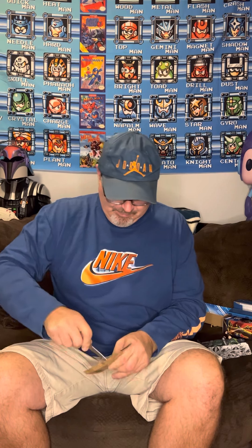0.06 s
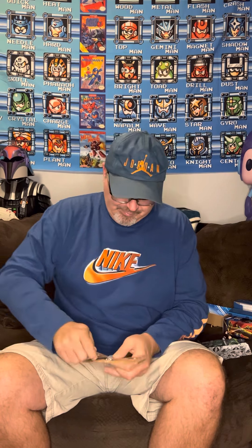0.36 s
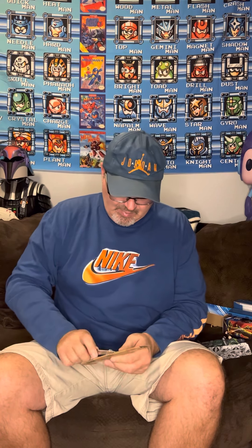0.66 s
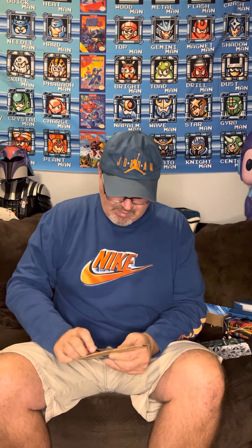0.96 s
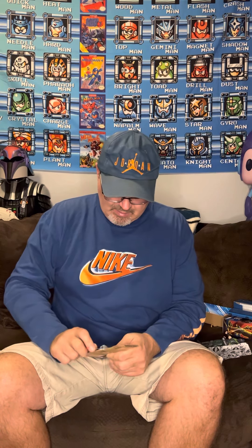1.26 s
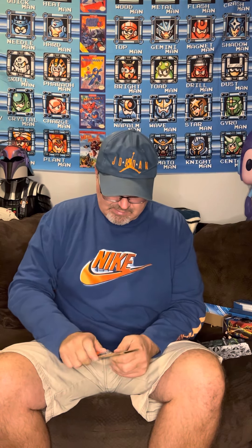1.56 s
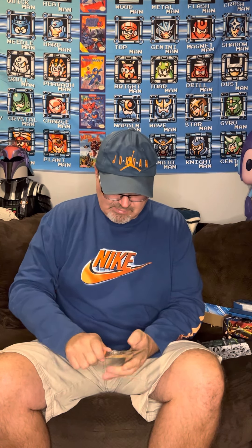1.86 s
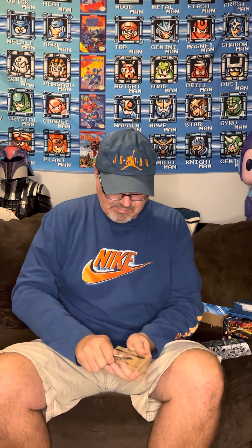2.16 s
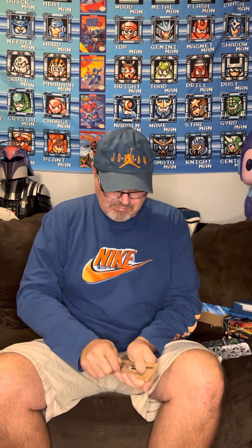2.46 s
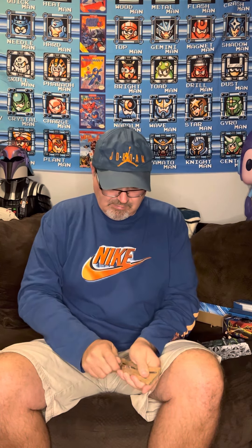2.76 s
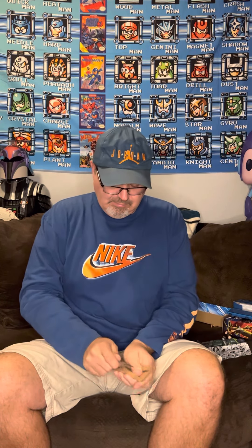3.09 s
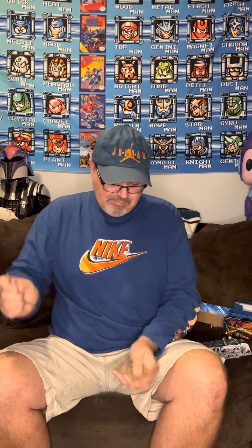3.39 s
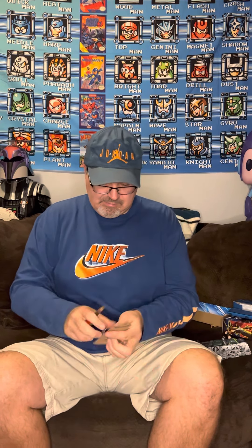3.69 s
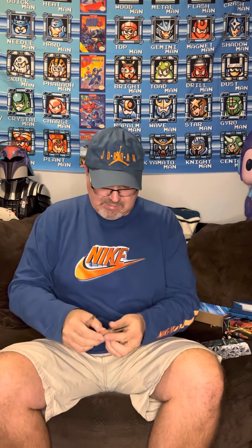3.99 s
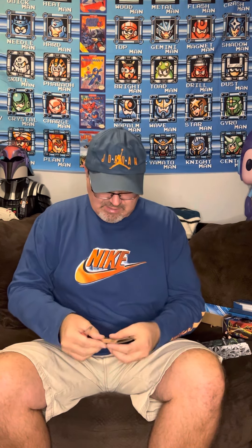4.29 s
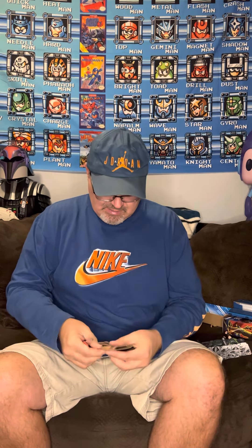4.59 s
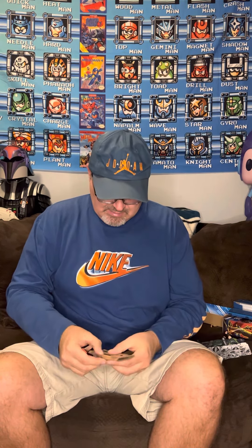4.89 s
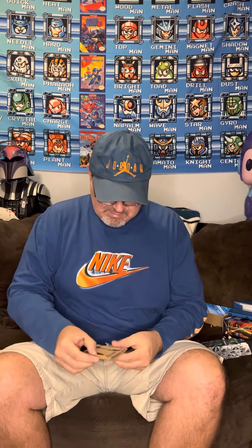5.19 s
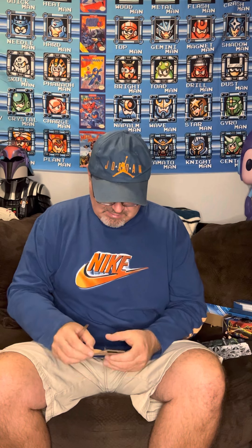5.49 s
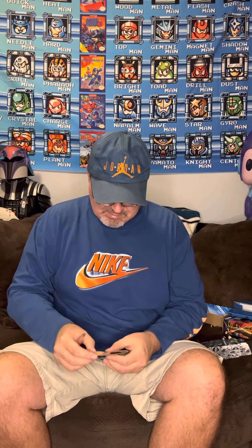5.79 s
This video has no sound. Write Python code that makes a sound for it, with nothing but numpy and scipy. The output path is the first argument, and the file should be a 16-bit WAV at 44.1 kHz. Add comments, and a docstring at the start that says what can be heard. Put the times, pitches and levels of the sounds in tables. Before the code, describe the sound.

Hands pry small parts out of a stiff plastic package, close to the microphone in a small quiet room. The plastic buckles in sharp, irregular snaps with fine crinkling and faint finger rubbing between them. About halfway, a part breaks free with a loud, briefly ringing crack and a soft thump of hands on a lap. More crackles follow and thin out, over a very faint hum and hiss.

```python
"""A small furnished room, where hands pry small parts out of a stiff plastic toy package.
The bending sheet buckles in sharp snaps that ring its modes, with fine crinkling around each one.
Fingers stick and slip over the plastic, and one part breaks free with a loud crack and a brief ring.
Hands bump softly on the lap; a faint mains hum, hiss and low rumble lie under it all."""
import sys
import numpy as np
from scipy import signal
from scipy.fft import rfft, irfft
from scipy.io import wavfile

SR = 44100
rng = np.random.default_rng(int(sys.argv[2]) if len(sys.argv) > 2 else 0)


def digitize_waveform(pressure):
    """Quantize a signal to 16-bit integers and store it at the path in sys.argv[1].

    Rows of a 2-D input are taken as channels; values are limited to [-1, 1].
    """
    field = np.atleast_2d(pressure).T
    bounded = np.clip(field, -1, 1)
    quanta = np.round(bounded * 32767).astype(np.int16)
    wavfile.write(sys.argv[1], SR, quanta)


N = 266805

# snaps of the sheet: (time [s], strength [dB], buckling length [ms], main resonance [Hz],
# body near 700 Hz [dB], edge near 13 kHz [dB])
SNAPS = [(0.0088, -6, 4.3, 5600, 0, 14.5), (0.0622, -6.5, 0.45, 6500.0, -18, 3),
         (0.1927, -14, 1.9, 4070.0, -7, 15), (0.199, -3.5, 1.7, 3830.0, 1.5, 4),
         (0.226, -5.5, 3.1, 4780.0, -5, 7.0), (0.2368, -4, 1.0, 7940.0, -7, -1.0),
         (0.2413, 2.5, 1.1, 5360.0, -27, -3), (0.262, -12, 6.0, 8440.0, -6.0, 5.0),
         (0.273, -11, 4.1, 5600.0, -5.0, 12), (0.285, -5.5, 6.2, 8960.0, 3.0, 2),
         (0.3523, -11, 3.5, 5500.0, 10.5, 12.5), (0.4891, -21.5, 4.9, 5450.0, -3, 14),
         (0.505, -11.5, 4.6, 3340.0, -5, 6.5), (0.5416, -11.5, 5.2, 6800.0, 10.0, 6.5),
         (0.7081, -21, 2.4, 8500.0, 9, 10), (0.7381, -16, 2.1, 6850.0, 5, 8),
         (0.8156, -10.5, 0.5, 8600.0, -4.0, 0), (0.915, -26.5, 2.3, 1400.0, 19, -3),
         (0.9327, -20.5, 2.7, 9700.0, 4, -6), (0.9933, -14.5, 2.1, 6800.0, -2.0, 6.0),
         (1.003, -11, 5.6, 7800.0, 18, 8.0), (1.0228, -13, 1.7, 6740, 19, 12),
         (1.0333, -6, 4.4, 6000, 18.5, 13), (1.096, -5.5, 5, 5200, 19.5, 0),
         (1.1618, -21.5, 3.7, 5380.0, -4, 6.0), (1.2356, 2, 7.2, 3130, 20.5, 2),
         (1.2513, -0.5, 11.6, 1280, 22.0, -1), (1.2742, 5, 4.1, 5960.0, 14.0, 8.0),
         (1.281, 7.5, 3.8, 5800.0, 2.5, 3), (1.4659, -12.5, 3.8, 4700, -1.5, -10),
         (1.62, -28.5, 3.5, 6900.0, 3.0, 14.5), (1.6596, -27, 2.7, 7640.0, -10, 14.5),
         (1.74, -23, 1.5, 6900.0, 12, 10), (1.801, -15.5, 2.4, 7500, 10.5, 14),
         (1.811, -10.5, 4.1, 6400, -4, 4), (1.8945, -21, 3.1, 6900.0, 1, 13),
         (1.9339, -16, 15, 7920.0, 11, 3), (1.9662, -10, 7.5, 7200.0, 18, 7),
         (2.155, -20.0, 11, 6000.0, 18, -1), (2.206, -24, 2.8, 2470.0, 19.5, 2),
         (2.2603, -19.5, 1.1, 8260.0, -4.0, 10), (2.266, -17.0, 1.2, 7390.0, -10.0, 5.0),
         (2.2842, -13, 0.98, 6000.0, 2.0, 8.0), (2.3645, -23.5, 5.5, 1680, 24.5, 14.0),
         (2.4041, -18.5, 10, 1980, 16.5, 10), (2.4168, -10.5, 0.97, 8200, -1, 8),
         (2.5192, -8.5, 2.1, 9300.0, -1, 6.5), (2.5446, -2.0, 4.3, 5800, -16, 6),
         (2.562, -6.5, 8.2, 5770.0, -17, 7.0), (2.5775, -5.5, 4.8, 8830.0, 3.5, 12),
         (2.6166, 1.5, 0.45, 6760.0, 6.5, 4.5), (2.774, -17, 3.1, 1550.0, 7.5, 5),
         (2.8003, -14, 1.1, 2480.0, -1.0, 6), (2.857, -18.5, 4.7, 1790.0, 32.5, 8.0),
         (2.8653, -10.5, 2.9, 1620.0, 0, 3), (2.899, -17.5, 4.8, 1860.0, 3.0, 9),
         (2.991, -12.5, 2.4, 2260, 1, 3.0), (3.0134, -16, 3.0, 1930.0, 4.0, 7),
         (3.036, -11.5, 7.2, 7960, 5.5, 12), (3.0763, -20.0, 3.3, 1810.0, 21.5, 12),
         (3.181, -4, 1.8, 3300.0, 10, 4.0), (3.1853, 16.5, 0.86, 3300, 7, -4.5),
         (3.3092, -16.5, 5.9, 2600, 12, 11.0), (3.3362, -4, 2.2, 7100.0, -7, 6.0),
         (3.369, -17, 0.8, 10000, -5, 19.5), (3.377, -5.5, 2.4, 7600.0, 6.5, 2.5),
         (3.402, -6.5, 1.9, 4130.0, 2, 3), (3.4259, -11.5, 2.0, 4260, 5, 3.0),
         (3.6358, -17.5, 3.5, 7550, 7, -3), (3.772, -20.0, 9.5, 3230.0, 15.5, -4),
         (3.8259, -21.0, 2.8, 7700, 4, 5), (3.862, -26.5, 2.4, 8200, 8.0, 10),
         (3.99, -19.0, 5.3, 4100, 22, 2), (4.014, -15, 21, 3650.0, 12, 1),
         (4.1147, -19.5, 2.7, 8830.0, 1, 6), (4.134, -13.0, 6.1, 4720.0, -6, 6),
         (4.166, -13, 4.8, 3900.0, 4, 1), (4.264, -24.5, 2, 5430.0, -16, 0),
         (4.311, -4.5, 3.8, 6900.0, 4.5, 3), (4.3165, 1.5, 7.2, 4970, -16, 3),
         (4.338, -8, 4.7, 4390.0, 0, 8), (4.43, -5, 5.2, 4330, 6.5, 2.5), (4.528, -20, 2.3, 8600.0, 8, 3),
         (4.585, -7, 4.5, 5500, 16, 8.5), (4.714, -14, 14, 10100, 1.5, 4.0),
         (4.8438, -26, 4.0, 7800, 4.0, 9), (4.8925, -21.5, 2.7, 6340, 9, 12.0),
         (4.945, -18.5, 16.0, 7760.0, 14.5, 15), (4.966, -15, 5.3, 7700.0, 5, 12.5),
         (5.055, -24.0, 5.4, 8810.0, 17, 12), (5.0761, -24.5, 2.9, 3320.0, 18, 10.0),
         (5.0948, -8, 2.6, 8700.0, 13.5, 10), (5.199, -25.5, 7.8, 2040, 23.5, 0),
         (5.6105, -18, 1.2, 7300.0, 0.5, 4), (5.649, -16.5, 3.0, 9350.0, -6, 13),
         (5.6805, -17, 0.9, 7150.0, -11, 3), (5.763, -25, 1.4, 5400.0, 6, 7),
         (5.7885, -26, 3.1, 6010.0, 13, 3), (5.918, -26, 9.1, 7900, 16.5, 11),
         (5.968, -25.5, 2.9, 7360.0, -5, 13)]


def gain_of(db):
    """Decibels to amplitude."""
    return 10 ** (np.asarray(db) / 20)


def unit_rms(x):
    """Scales to an rms of 1."""
    return x / np.sqrt(np.mean(x ** 2) + 1e-20)


def curve_at(points, hz):
    """Joins (Hz, value) points by straight lines on a log-frequency axis."""
    f, value = np.transpose(points)
    return np.interp(np.log(hz + 1), np.log(np.abs(f) + 1), value)


def bins(size):
    """Frequencies of a spectrum of so many samples."""
    return np.fft.rfftfreq(size, 1 / SR)


def add(mix, s, sound):
    """Mixes a sound in at s seconds."""
    part = mix[:, max(round(s * SR), 0):][:, :sound.shape[-1]]
    part += sound[..., :part.shape[1]]


def wander(size, per_s):
    """A random curve of about unit spread with so many turns a second."""
    t = np.arange(size) / SR
    return np.interp(t * per_s, np.arange(512), rng.standard_normal(512))


def causal_eq(x, db):
    """Minimum-phase EQ with a gain for each bin: nothing sounds before the click."""
    size = x.shape[-1]
    log_gain = np.log(gain_of(db))
    mirrored = np.r_[log_gain, log_gain[1:size - len(db) + 1][::-1]]
    phase = -signal.hilbert(mirrored).imag[:len(db)]
    return irfft(rfft(x) * np.exp(log_gain + 1j * phase), size)


def diffuse(size):
    """Stereo white noise, centred in the bass and wider above."""
    # left-right likeness of diffuse sound: (frequency [Hz], coherence [0-1])
    likeness = [(60, .997), (150, 0.89), (350, 0.6), (700, 0), (1400, 0.6), (3200, 0.8), (7000, 0.2),
                (15000, .2)]
    a, b = rfft(rng.standard_normal((2, size)))
    same = np.clip(curve_at(likeness, bins(size)), 0, 1)
    mid, side = a * np.sqrt((1 + same) / 2), b * np.sqrt((1 - same) / 2)
    return irfft(np.array([mid + side, mid - side]), size)


def shaped_noise(gains, size):
    """Diffuse noise with a gain for each bin, at an rms of 1."""
    return unit_rms(irfft(rfft(diffuse(size)) * gains, size))


def echo_tail(rise_s, t60=0.2, lumpy_db=3, size=16384):
    """Dying echoes of sheet and room in uneven clumps, of energy 1."""
    t = np.arange(size) / SR
    fade = gain_of(lumpy_db * wander(size, per_s=550) - 60 * t / t60)
    return unit_rms(diffuse(size) * fade * (1 - np.exp(-t / rise_s))) / np.sqrt(size)


def room_tone(noise_db=-74):
    """A steady bed of bass-heavy noise, faint hiss and mains hum."""
    # colour of the quiet room: (frequency [Hz], relative level [dB])
    colour = [(20, -42.5), (35, -15), (62, -3.5), (90, -9), (125, -6.5), (160, -8), (300, -15), (600, -23),
              (1500, -29.5), (3000, -34.5), (7000, -35.5), (11000, -40.5), (16000, -44.5)]
    # partials of the hum: (frequency [Hz], rms level [dB])
    partials = [(60, -77), (119.5, -77)]
    t = np.arange(N) / SR
    noise = shaped_noise(gain_of(curve_at(colour, bins(N))), N)
    hum = sum(np.sqrt(2) * gain_of(db) * np.sin(2 * np.pi * (hz * t + rng.random()))
              for hz, db in partials)
    return gain_of(noise_db) * noise + hum


def rumble(early_db=-68, late_db=-78, sink_s=(3.6, 4.4), low_hz=45, high_hz=90, uneven_db=3):
    """A low, uneven rumble that sinks away in the second half."""
    hz = bins(N)
    band = (hz / low_hz) ** 4 / (1 + (hz / low_hz) ** 4) / (1 + (hz / high_hz) ** 4)
    level_db = np.interp(np.arange(N) / SR, sink_s, [early_db, late_db])
    level_db += uneven_db * wander(N, per_s=9)
    return gain_of(level_db) * shaped_noise(band, N)


def lap_bumps(knock_t60=0.08, knock_rise_s=0.00035, sag=0.15, sag_s=0.051, scuff_db=-4, scuff_hz=290,
              thud_t60=0.061, thud_rise_s=0.0036, room_db=-19, size=8192):
    """Hands meet the lap: a padded knock that sags in pitch, a scuff, then a thud, echoed by the room."""
    # (time [s], knock level [dB], knock pitch [Hz], thud delay [s], thud level [dB], thud pitch [Hz])
    hand_bumps = [(3.188, -35, 256, 0.015, -28, 88), (3.565, -42, 290.6, 0.024, -53, 76.6),
                  (3.724, -45, 330, 0.0105, -37.5, 72.5)]
    out, t = np.zeros((2, N)), np.arange(size) / SR
    padding = 1 / (1 + (bins(size) / scuff_hz) ** 4)
    for s, knock_db, knock_hz, delay_s, thud_db, thud_hz in hand_bumps:
        cycles = np.cumsum(knock_hz * (1 - sag * (1 - np.exp(-t / sag_s)))) / SR
        scuff = gain_of(scuff_db) * shaped_noise(padding, size)
        knock = (np.sin(2 * np.pi * cycles) + scuff) * gain_of(knock_db - 60 * t / knock_t60)
        thud = gain_of(thud_db - 60 * t / thud_t60) * np.sin(2 * np.pi * thud_hz * t)
        add(out, s, knock * (1 - np.exp(-t / knock_rise_s)))
        add(out, s + delay_s, thud * (1 - np.exp(-t / thud_rise_s)))
    room = signal.oaconvolve(out, echo_tail(rise_s=0.004, t60=0.25), axes=1)[:, :N]
    return out + gain_of(room_db) * room


def grains(level_db, colour, per_s, spread_db):
    """Tiny clicks of uneven size that follow a level curve, each with its echo."""
    sizes = gain_of(spread_db * np.minimum(rng.exponential(1, N), 3)) * rng.choice([-1, 1], N)
    clicks = gain_of(level_db) * unit_rms(sizes * (rng.random(N) < per_s / SR))
    echoes = signal.oaconvolve(clicks[None], echo_tail(rise_s=0.002), axes=1)[:, :N]
    eq = unit_rms(gain_of(curve_at(colour, bins(N))))
    return irfft(rfft(0.6 * clicks + 0.8 * echoes) * eq, N)


def strain(t, loudest_db=-49, db_per_snap_db=0.7, lead_s=0.015, settle_s=0.03):
    """Amplitude of the strained sheet's crinkling, which builds before each snap and settles after."""
    s, db = np.array(SNAPS).T[:2, :, None]
    away = np.maximum((s - t) / lead_s, (t - s) / settle_s)
    peaks = gain_of(loudest_db + db_per_snap_db * np.minimum(db, 0))
    return np.linalg.norm(peaks * np.exp(-away), axis=0)


def crinkle_and_rub(crinkle_trim_db=-4, rub_trim_db=-2, clump_db=3):
    """Clumps of fine crinkling in the bent sheet and the stick-slip of fingers on it."""
    # how busy the hands are: (time [s], crinkling before trim [dB], rubbing before trim [dB])
    activity = [(0, -65, -70), (.42, -70, -91), (.6, -61, -58), (.85, -61, -73.5), (1.2, -59.5, -71.5),
                (1.55, -62.5, -86), (2.1, -54, -65.5), (2.35, -66.5, -72), (2.65, -53, -64),
                (3.3, -62.5, -61.5), (3.55, -67.5, -67), (3.9, -69.5, -70.5), (4.3, -57, -72),
                (5.18, -66.5, -69), (5.27, -88.5, -90.5), (5.58, -87, -90), (5.7, -68.5, -81),
                (6.05, -70.5, -78)]
    # bright colour of the crinkling: (frequency [Hz], relative level [dB])
    crinkle_colour = [(300, -30.5), (1500, -30.5), (3500, -2), (6500, 6.5), (9000, 5), (12000, -17),
                      (15000, -5), (16500, -9)]
    # midrange colour of the rubbing: (frequency [Hz], relative level [dB])
    rub_colour = [(120, -15.5), (350, -10), (700, -7.5), (1100, -2), (1900, 5.5), (2800, 3.5), (5000, -10),
                  (12000, -32.5)]
    s, crinkle_db, rub_db = np.transpose(activity)
    t = np.arange(N) / SR
    frames = t[::128]
    handled = gain_of(np.interp(t, s, crinkle_db) + crinkle_trim_db)
    strained = np.interp(t, frames, strain(frames))
    clumps_db = clump_db * wander(N, per_s=45)
    bending_db = 20 * np.log10(np.hypot(handled, strained)) + clumps_db
    fingers_db = np.interp(t, s, rub_db) + rub_trim_db + clumps_db / 2
    crinkle = grains(bending_db, crinkle_colour, per_s=420, spread_db=8)
    rub = grains(fingers_db, rub_colour, per_s=810, spread_db=6.5)
    return crinkle + rub


def freed_part(break_s=3.186, rise_s=0.00081, stereo_spread_rad=0.35, size=16384):
    """The stiff little part rings briefly as it cracks loose."""
    # modes of the part: (frequency [Hz], level [dB], t60 [s])
    modes = [(700, -41, .12), (3034, -27, .15), (3314, -27, .16), (3463, -28, .16), (3567, -29, .18),
             (3786, -32, .15), (3977, -31, .15), (4221, -33, .17), (6920, -30, .14), (7296, -31, .14),
             (7655, -34, .14), (7807, -33, .14)]
    out, t = np.zeros((2, N)), np.arange(size) / SR
    for hz, db, t60 in modes:
        phase = 2 * np.pi * rng.random() + stereo_spread_rad * rng.standard_normal((2, 1))
        mode = gain_of(db - 60 * t / t60) * np.sin(2 * np.pi * hz * t + phase)
        add(out, break_s, mode * (1 - np.exp(-t / rise_s)))
    return out


def buckling(length_s, size, slips_per_s=3000, slip_db=-8, abrupt_s=0.005, bounce_s=0.0025, bounce=0.3):
    """A crease flips: a short one in one click, a long one in a swelling run of slips; energy 1."""
    t = np.arange(size) / SR
    swell = t / length_s * np.exp(1 - t / length_s * 2)
    run = gain_of(slip_db) * swell * rng.standard_normal(size) * (rng.random(size) < slips_per_s / SR)
    run[0] = np.exp(-(length_s / abrupt_s) ** 2)  # the opening click
    run += bounce * np.roll(run, round(bounce_s * rng.uniform(0.8, 1.25) * SR))  # a close reflection
    return unit_rms(run) / np.sqrt(size)


def dispersed(x, delay_s=0.000496):
    """Bending waves cross the sheet faster in the treble, so a click spreads to a few cycles."""
    phase = 2 * np.pi * delay_s * np.sqrt(bins(len(x)) * SR / 2)
    return irfft(rfft(x) * np.exp(-1j * phase), len(x))


def snap_tint(hz, s, body_db, edge_db, twist_from_s=2.33, twist_to_s=3.15, twist_db=10.5):
    """One snap's EQ in dB: the hollow middle grows with the body, and jumps while both hands twist."""
    hollow_db = 2 + 0.38 * body_db + twist_db * (twist_from_s < s < twist_to_s)
    points = [(200, 0), (480, body_db), (1050, body_db), (2300, hollow_db), (6500, 0), (13000, edge_db)]
    return curve_at(points, hz)


def sheet_snaps(crack_db=-3, crack_db_per_ms=-0.66, peak_db=8, peak_width=0.17,
                echo_db=-1.5, peak_echo_db=-2, ripple_db=3, ripple_hz=170, size=10240):
    """Each snap rings the sheet's modes and some resonances of its own, which change with the grip."""
    # colour shared by all snaps: (frequency [Hz], gain [dB])
    colour = [(100, -40), (230, -26), (340, -17), (480, -17.5), (640, -13.5), (850, -15.5), (1200, -18),
              (1550, -12.5), (2000, -8.5), (3200, -9.5), (4500, -6), (5300, -2), (6500, 0.5), (8300, 0.5),
              (10300, -5.5), (12000, -15), (14800, -12)]
    # modes of the package: (frequency [Hz], width [Hz], boost [dB])
    modes = [(856, 28, 5), (1141, 36, 9), (1250, 79, 7), (1850, 45, 3.5), (2853, 16, 7.5), (4320, 130, 4),
             (5410, 70, 0.5), (5845, 98, 3.5), (6200, 89, 4), (6770, 61, 7), (7100, 34, 7.5), (7860, 80, 6)]
    # share of a snap that lingers as echo: (frequency [Hz], gain [dB])
    linger = [(300, 2), (800, -4.5), (1600, -3), (3500, 1.5), (7500, -1.5), (14000, -2)]
    out, hz = np.zeros((2, N)), bins(size)
    modes_db = sum(db / (1 + (2 * (hz - f) / width) ** 2) for f, width, db in modes)
    sheet_db = curve_at(colour, hz) + modes_db
    linger_db = echo_db + curve_at(linger, hz)
    for s, db, length_ms, main_hz, body_db, edge_db in SNAPS:
        length_s = max(length_ms, 0.5) / 1000
        sharpness = gain_of(crack_db + crack_db_per_ms * length_ms)  # a quick snap cracks harder
        crack = sharpness * dispersed(buckling(length_s, size))
        resonance = 1 / (1 + ((hz / main_hz - 1) / peak_width) ** 2)
        tail = echo_tail(rise_s=length_s / 2, size=size)
        echo = irfft(rfft(tail) * gain_of(linger_db + peak_echo_db * resonance), size)
        grip_db = ripple_db * np.interp(hz / ripple_hz, np.arange(400), rng.standard_normal(400))
        eq_db = sheet_db + snap_tint(hz, s, body_db, edge_db) + peak_db * resonance + grip_db
        snap = (crack + echo) / np.hypot(1, sharpness)
        add(out, s, causal_eq(snap, db + eq_db))
    return out


def scene():
    """The package and the hands over the room's quiet bed, in stereo."""
    return sheet_snaps() + freed_part() + crinkle_and_rub() + lap_bumps() + room_tone() + rumble()


def record(dry, left_db=0.24, low_cut_hz=42, high_cut_hz=16150):
    """Two close microphone ports, shifted in phase in the treble, then a low cut and a steep high cut."""
    # phase by which the left port leads: (frequency [Hz], phase [rad])
    port_phase = [(1500, 0), (4500, .05), (5500, -.8), (7300, -1.25), (12000, -1.3), (16000, -1.8)]
    lead = np.exp(0.5j * curve_at(port_phase, bins(N)))
    ports = irfft(rfft(dry) * np.array([lead * gain_of(left_db), 1 / lead]), N)
    low_cut = signal.butter(3, low_cut_hz, "highpass", fs=SR, output="sos")
    high_cut = signal.firwin(255, high_cut_hz, window=("kaiser", 9), fs=SR)
    return signal.oaconvolve(signal.sosfilt(low_cut, ports), high_cut[None], "same", axes=1)


dry = scene()
out = record(dry)
digitize_waveform(out)
```